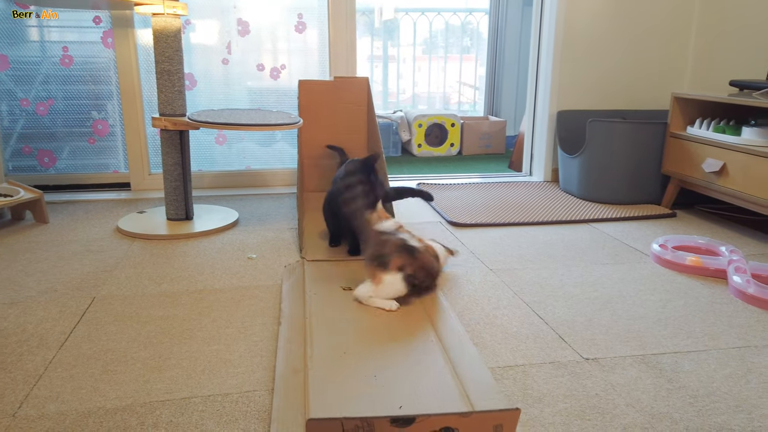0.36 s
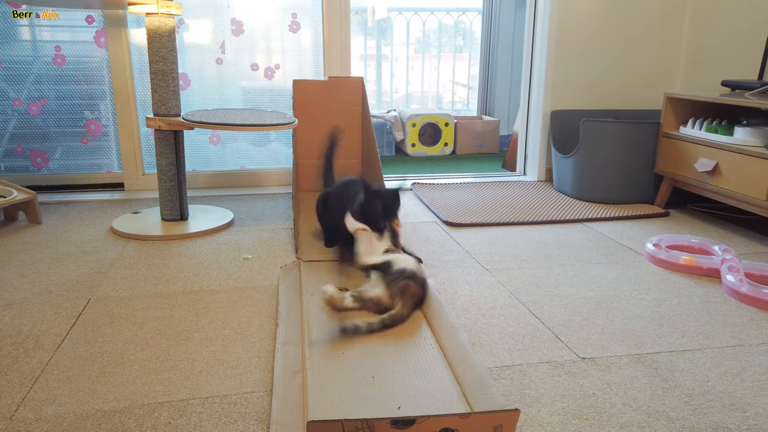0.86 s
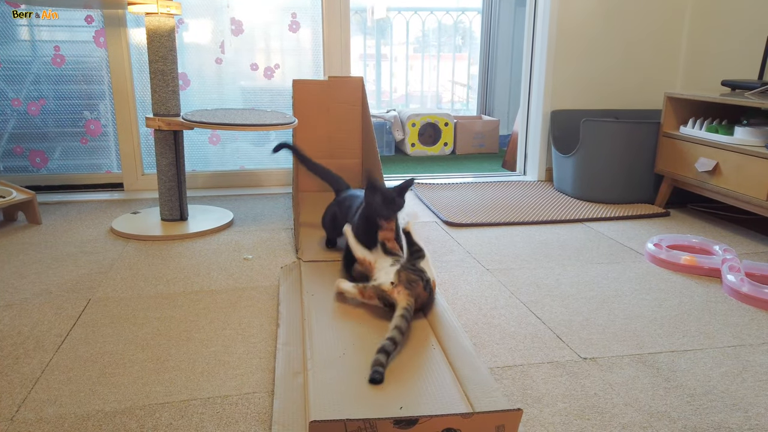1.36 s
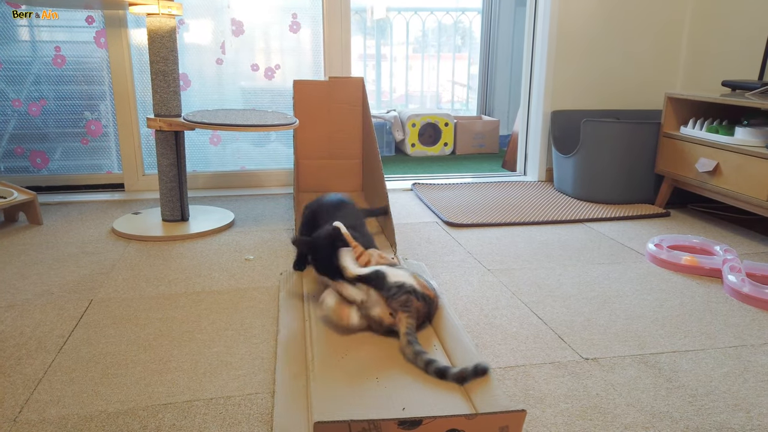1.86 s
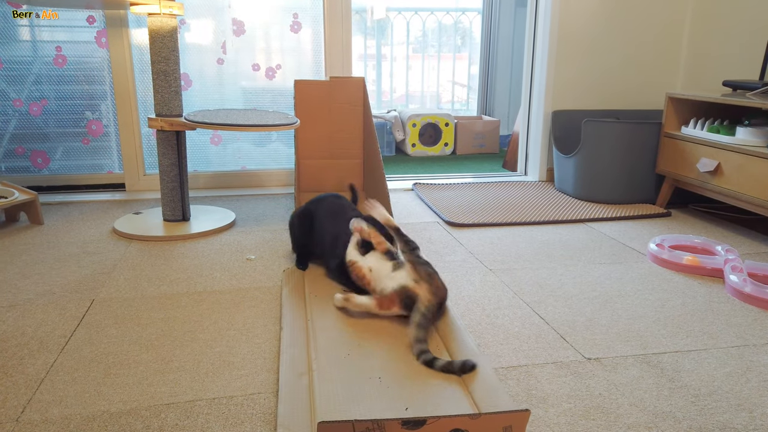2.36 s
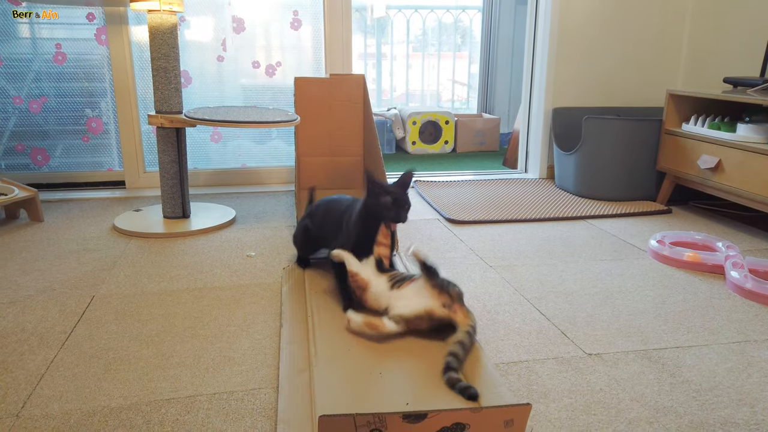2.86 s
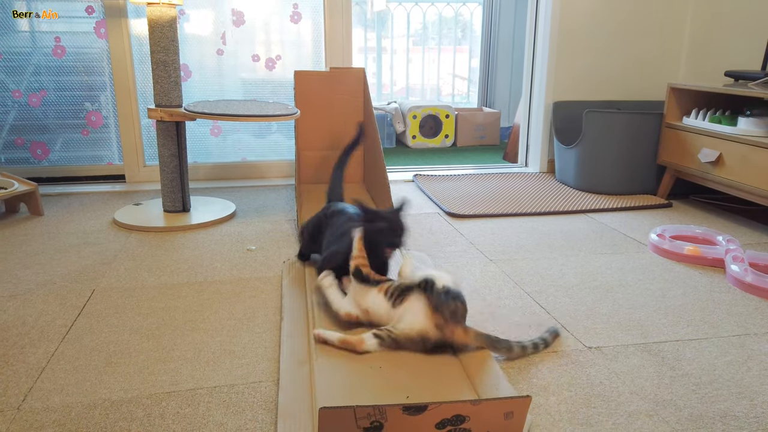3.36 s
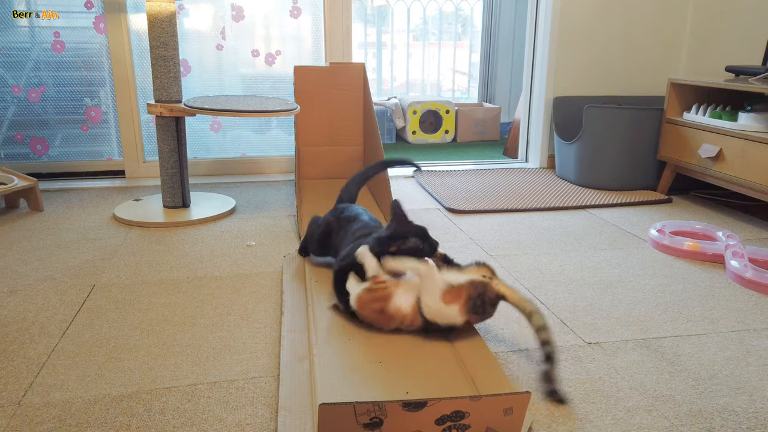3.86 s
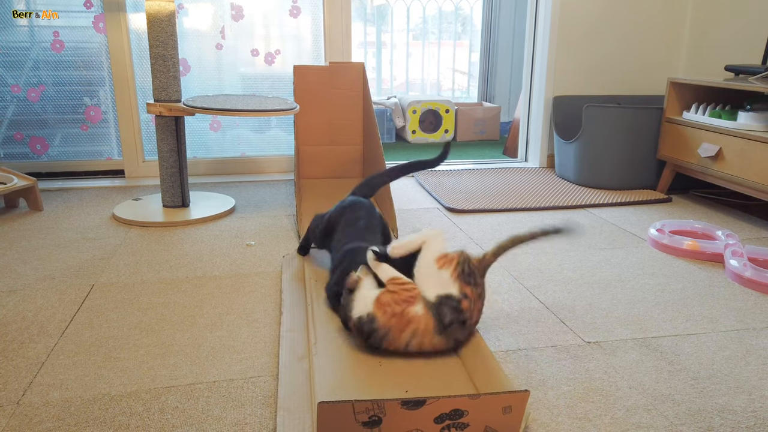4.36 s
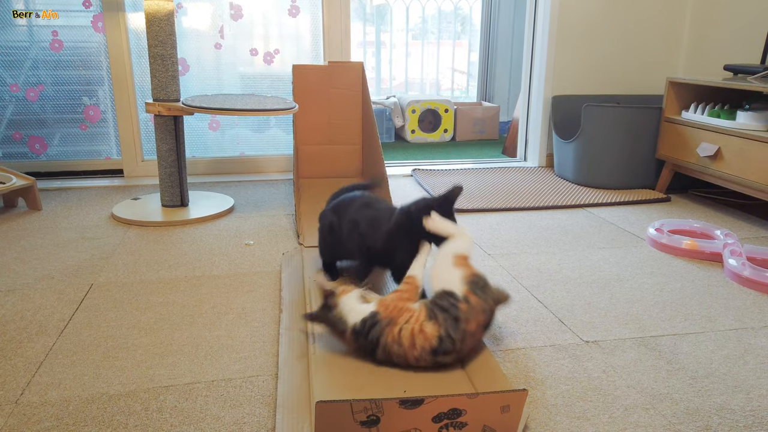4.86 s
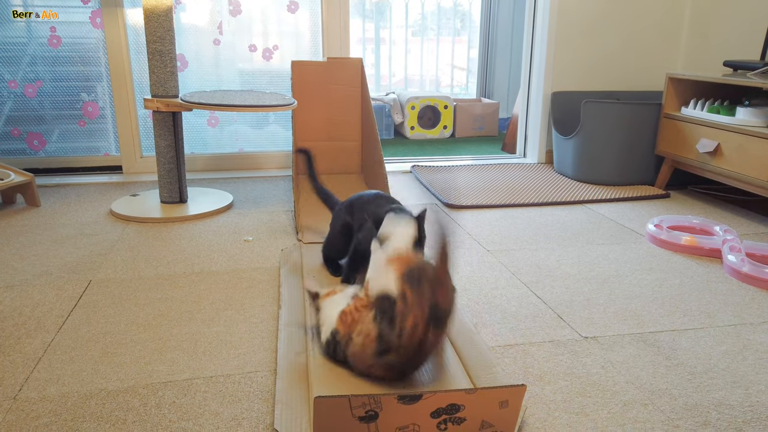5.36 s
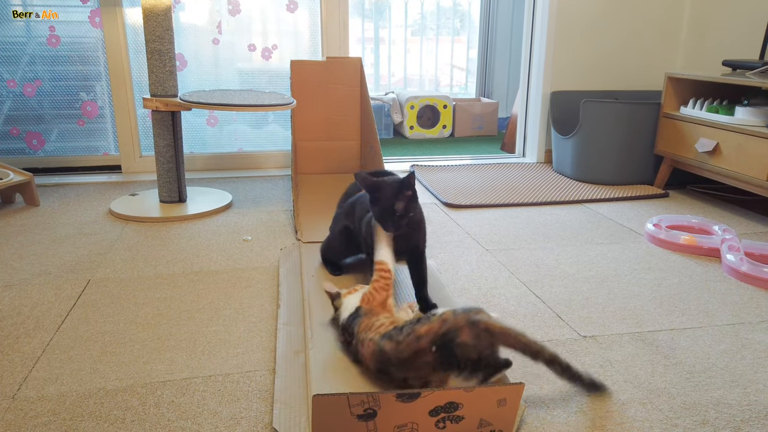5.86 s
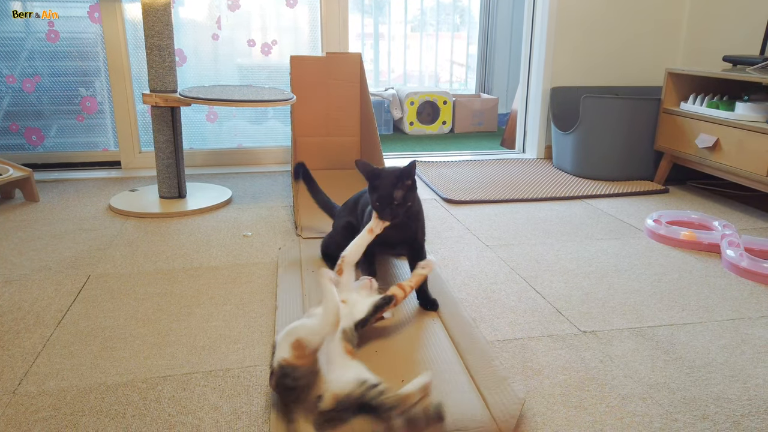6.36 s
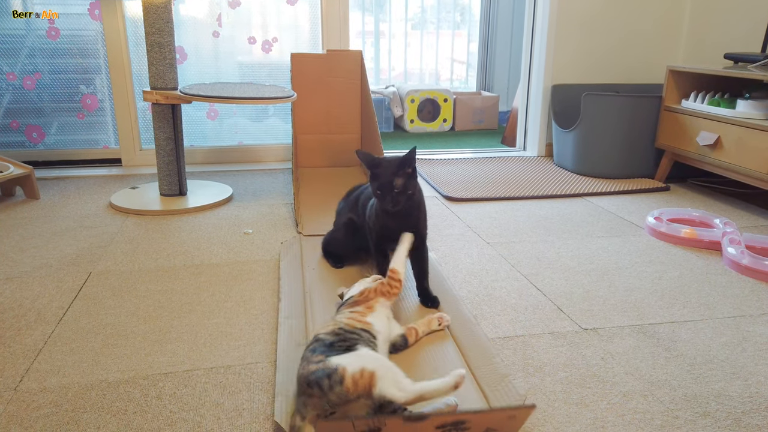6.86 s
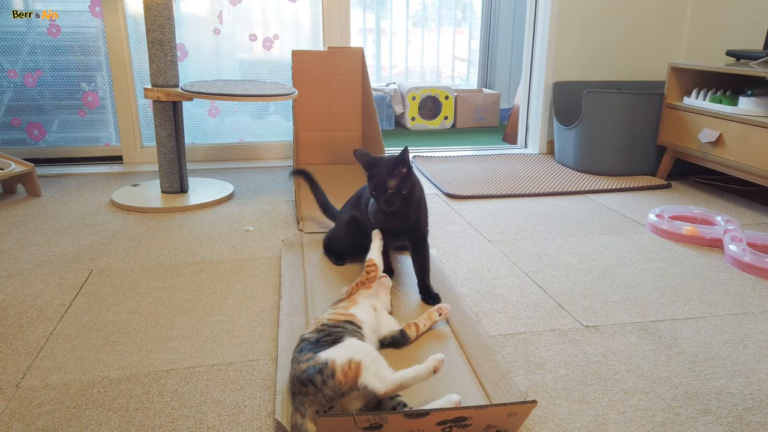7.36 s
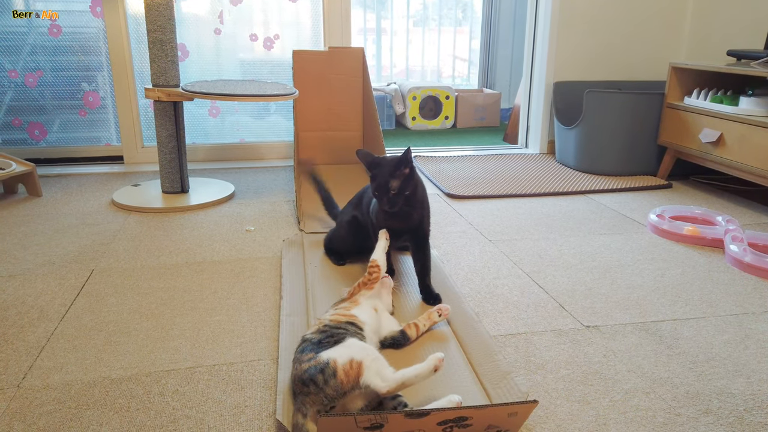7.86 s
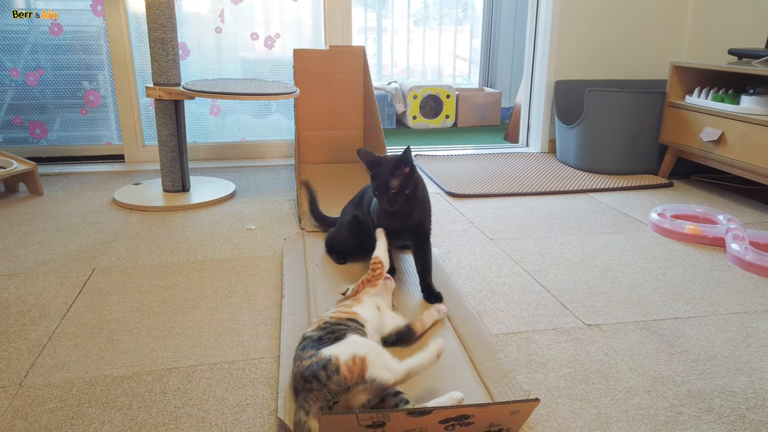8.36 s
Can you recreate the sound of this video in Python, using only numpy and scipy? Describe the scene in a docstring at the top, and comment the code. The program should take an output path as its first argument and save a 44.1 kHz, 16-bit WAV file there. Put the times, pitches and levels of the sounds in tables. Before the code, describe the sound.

Two cats tussle on flattened cardboard in a small soft room. The first two seconds are busiest: padded thumps, a strong burst of fur and claw rasp, then a sharp dry knock and a patter of lighter taps. Later come quieter slides and scuffs, a cluster of ticks, and one heavy hollow bang on the box. Then near silence with a dull bump. Close stereo microphones on the floor, low hum beneath.

```python
"""In a small, soft room two cats wrestle on a flattened cardboard box, a few steps from a camera on the floor.
Fur slides over the board and claws rasp: shaped stereo noise that follows each stroke over a faint steady floor.
Paws and bodies thump it, and one kick knocks the upright flap: filtered pushes, box modes and a room tail.
Brief claw scuffs, a dull floor bump, a low sway and narrow rustles are heard between.
Under it the room hums low: wavering narrow lines and quiet air."""
import sys
import numpy as np
from scipy import signal
from scipy.fft import rfft, irfft
from scipy.io import wavfile
from scipy.ndimage import uniform_filter1d, map_coordinates

SR = 44100
rng = np.random.default_rng(int(sys.argv[2]) if len(sys.argv) > 2 else 0)


def wrap_up_sound(samples):
    """Save the sound to the file named by the first command line argument, as 16-bit audio."""
    columns = np.atleast_2d(samples).T
    # keep every value between -1 and 1, then stretch to whole-number steps
    tamed = np.clip(columns, -1, 1)
    steps = np.round(tamed * 32767).astype(np.int16)
    wavfile.write(sys.argv[1], SR, steps)


def nominal_scale(level):
    """Amplitude ratio for a level in decibels (scalar or array-like)."""
    x = np.asarray(level, float) / 20
    return 10 ** x


N = 384492

# a body or paw slides over the board; levels before the room's lingering:
# (full speed from [s], held [s], fur hiss [dB], rasp [dB], rasp centre [Hz])
SLIDE_STROKES = [(0.0, 0.11, -62, -57, 1173), (0.258, 0.12, -55.5, -58.5, 1900),
                 (.56, 0.033, -63, -53.5, 1184), (.66, 0.027, -59, -52, 1100),
                 (.83, 0.044, -37.5, -39.5, 1935), (.92, 0.03, -39, -34.5, 1270),
                 (1.029, 0.088, -54.5, -45, 1113), (1.18, 0.073, -54, -53, 1110),
                 (1.3, 0.036, -57.5, -50.5, 1120), (1.4, 0.036, -64, -60, 1130),
                 (1.571, 0.016, -49, -47.5, 1187), (1.682, 0.37, -54, -54.5, 1402),
                 (2.171, 0.23, -70, -67, 1300), (2.399, 0.057, -61, -66.5, 1500),
                 (2.6, 0.14, -61.5, -66.5, 1300), (2.75, 0.049, -55.5, -54.5, 1250),
                 (2.83, 0.056, -59.5, -58.5, 1230), (3.01, 0.013, -49.5, -46, 1830),
                 (3.07, 0.063, -54.5, -51.5, 1522), (3.19, 0.017, -52.5, -54, 1300),
                 (3.27, 0.18, -56.5, -54, 1300), (3.5, 0.073, -51.5, -55, 1658),
                 (3.62, 0.072, -57, -58.5, 1650), (3.77, 0.19, -67.5, -62.5, 1500),
                 (3.969, 0.057, -57, -60, 1573), (4.05, 0.094, -55, -56, 1870),
                 (4.2, 0.066, -63.5, -63, 1697), (4.31, 0.31, -55.5, -55.5, 1935),
                 (4.64, 0.063, -52.5, -54.5, 1500), (4.76, 0.11, -60.5, -56, 1300),
                 (4.866, .14, -53.5, -51.5, 1480), (5.15, 0.094, -68, -64.5, 1380),
                 (5.4, 0.024, -55.5, -53.5, 1840), (5.62, .02, -46.5, -45.5, 1700),
                 (5.68, 0.012, -57, -46.5, 1658), (5.88, 0.047, -70, -63.5, 1240),
                 (6.0, 0.17, -78, -75, 1300), (6.23, 0.051, -58.5, -57.5, 1755),
                 (6.48, 0.012, -62, -51.5, 1185), (6.55, 0.0062, -56, -52, 1008),
                 (7.68, 0.026, -76, -77.5, 1300), (8.618, 0.034, -60.5, -64, 1914)]
# fur on board, relative spectrum: (frequency [Hz], density [dB per Hz])
FUR_SPECTRUM = [(1530, -30), (2600, -42.5), (2700, -10), (3310, -12.5), (3900, -13), (4230, -14),
                (5500, -10), (6160, -13), (9440, -14), (11100, -9), (14600, -20.5), (15600, -24.5)]
# resonances of the rubbed board: (centre [Hz], width [Hz], relative level [dB])
FLUTE_RESONANCES = [(560, 200, -8), (1080, 200, 1.5), (1450, 250, -5), (1950, 300, 0), (2600, 450, -2)]
# blows on the board; levels before the direct gain, band edges are fractions of the knock scale:
# (time [s], knock [dB], thud [dB], snap [dB], knock scale [Hz])
BLOW_EVENTS = [(.225, -54, -47.5, -46, 1040), (.468, -21, -26.5, -24, 1510),
               (.627, -28.5, -31, -33.5, 1630), (0.656, -29.5, -37, -38, 1300),
               (1.014, -31.5, -34.5, -58, 1260), (1.063, -12.5, -25, -28, 1680),
               (1.29, -35.5, -45.5, -42, 1320), (1.835, -67, -50, -65, 920),
               (1.922, -36.5, -54.5, -47, 1780), (1.993, -36, -38, -35, 1420),
               (2.02, -30.5, -46.5, -44.5, 1251), (2.028, -39, -30, -56, 860), (2.048, -35, -42, -57, 890),
               (2.737, -36, -47, -45, 1230), (3.372, -33.5, -65, -42.5, 2130),
               (4.603, -49, -38.5, -54, 1190), (5.537, -52, -67, -45.5, 2120), (5.61, -38, -47, -26, 1520),
               (5.62, -36, -52, -35, 1700), (5.684, -37.5, -33, -42, 840), (5.762, -36.5, -44.5, -50, 1760),
               (6.221, -60, -72, -54, 2100), (6.522, -10.5, -13.5, -36, 1170)]
# box and air ring together, decay when unpressed: (mode [Hz], relative level [dB], t60 [s])
BOX_MODES = [(183, -3, 0.45), (350, 0, 0.37), (415, -5, 0.24), (479, -11, 0.48), (576, -6, 0.29),
             (646, -2, 0.21), (743, -10, 0.3), (861, -13, 0.38), (910, -12, 0.37), (991, -9, 0.28)]
# band of the snap: (low edge [Hz], high edge [Hz])
SNAP_BAND = (1300, 2560)
# decay of the room: (frequency [Hz], t60 [s])
ROOM_DECAY = [(150, 0.4), (600, 0.42), (2000, 0.49), (8000, 0.091)]
# short claw scuffs: (time [s], skid [dB], centre [Hz], length [s], treble swish [dB])
CLAW_SCUFFS = [(0.463, -57, 2160, 0.03, -44), (2.73, -48.5, 1450, 0.029, -52.5),
               (2.974, -43.5, 1600, 0.05, -61), (4.83, -47.5, 1690, 0.032, -59.5),
               (5.541, -52.5, 2120, 0.028, -51), (5.597, -39.5, 1950, 0.015, -41),
               (4.949, -55.5, 1300, 0.12, -91.5), (5.777, -50.5, 1470, 0.0086, -72),
               (6.227, -53, 1730, 0.068, -113.5), (6.429, -48.5, 1430, 0.14, -63)]
# dull bump through the floor: (peak [dB], start [Hz], end [Hz])
BUMP = (-27, 90, 72)
# the floor sways under a rolling body: (time [s], level [dB], half length [s])
FLOOR_SWAYS = [(.45, -48, 0.25), (5.65, -42.5, 0.12)]
# narrow rustles that swell and fade: (time [s], level [dB], centre [Hz], width [Hz], half length [s])
RUSTLES = [(1.572, -54, 630, 300, 0.06), (1.575, -44, 2490, 720, 0.044), (1.585, -45.5, 13100, 3470, 0.042),
           (7.4, -72.5, 7840, 1300, 0.048), (8.45, -56.5, 189.4, 60, 0.064)]
# low lines of the room: (centre [Hz], width [Hz], level [dB])
HUM_LINES = [(26.85, 7, -54.5), (57.5, 7.2, -56.5), (125.9, 10, -66.5), (160, 12, -68), (183.4, 8.6, -64.5)]
# still air, relative spectrum: (frequency [Hz], density [dB per Hz])
AIR_SPECTRUM = [(47, -42), (80, -2), (185, -3), (241, -13.5), (328, -6.5), (447, -31), (623, -19),
                (1260, -23.5), (1380, -28.5), (1640, -24.5), (2560, -27.5), (3410, -40), (15600, -46.5)]
# correlation between the two microphones: (frequency [Hz], left-right likeness [0 to 1])
MICROPHONE_LIKENESS = [(60, 0.92), (180, 1), (550, 0.97), (1650, 0.79), (4970, 0.23), (15000, 0.068)]

RISE_DB_PER_S, FALL_DB_PER_S = 213.5, 166  # a slide speeds up and comes to rest
BASE_HISS_DB, BASE_RASP_DB = -83, -86  # steady faint hiss and rasp-coloured noise floor under the slides
# rumble at a mean rasp; dB per dB of rasp; the weight shifts slowly
RUMBLE_DB, RUMBLE_FOLLOWS, SETTLE_S = -64.5, 0.4, 0.13
DIRECT_DB = -3  # direct sound, before nearness and ticks add to it
HEAVY_DB, HEAVY_GAIN = -23, 0.48  # thuds above this land nearer, dB per dB
# knocks this far over their thud are dry claw ticks: direct sound gains dB per dB, up to a limit
TICK_DB, TICK_GAIN, TICK_MOST_DB = 8, 0.9, 6
BOUNCE_S, BOUNCE = .00235, .85  # the direct sound comes once more off the floor: delay, gain
CRACK_DB, CRACK_HZ = -13, (2600, 8000)  # a claw's dry edge: against the snap, band
BODY_DB, BODY_HZ, BODY_S = -11, 89.6, 0.0066  # floor push: against the thud, pitch, time constant
SAG_DB, SAG_HZ = -10.5, (110, 275)  # the loose board sags: against the thud capped at HEAVY_DB, band
RING_DB, RING_GAIN = -13, 0.24  # ring under light blows; more above HEAVY_DB, dB per dB
PRESSED = .3  # share of its ring time the board keeps under a cat; heavy blows shake it free
BUMP_S = 7.563
SWELL_DB, SWELLS_PER_S = 1.5, 1.964  # random swell of the lowest hum: spread, points a second
AIR_DB = -58


def sliding():
    """Fur hisses, paws rasp on the board's resonances, and the shifting weight makes it rumble."""
    motion = strokes()
    hiss_db, rasp_db, _ = curves(motion)

    def rasp_gain(hz, t):
        centre_hz = curves(motion, t)[2]
        flutes = sum(nominal_scale(db) * resonance(hz, c, w) for c, w, db in FLUTE_RESONANCES)
        return hump(hz, centre_hz, 0.99) * flutes

    fur = pair(N, lambda hz, t: nominal_scale(along(FUR_SPECTRUM, hz)), patchy_db=1.5)
    rasp = pair(N, rasp_gain, patchy_db=1.2, rough_db=2.5)
    rumble = pair(N, lambda hz, t: hump(hz, 300, .7), patchy_db=1.5, rough_db=1)
    pressure_db = uniform_filter1d(rasp_db - rasp_db.mean(), round(SETTLE_S * SR) + 1)
    weight_db = RUMBLE_DB + RUMBLE_FOLLOWS * pressure_db
    hiss = lingering(hiss_db, t60=0.033) * unit(fur)
    rasp = lingering(rasp_db, t60=0.1002) * unit(rasp)
    return hiss + rasp + nominal_scale(weight_db) * unit(rumble)


def strokes():
    """Time, hiss dB, rasp dB and rasp centre Hz of all slides over the steady noise floor."""
    t = np.arange(0, N / SR + .004, .002)
    s, held, hiss_db, rasp_db, centre_hz = np.transpose(SLIDE_STROKES)[:, :, None]
    rising_db = RISE_DB_PER_S * np.clip(s - t, 0, None)
    falling_db = FALL_DB_PER_S * np.clip(t - s - held, 0, None)
    slower_db = rising_db + falling_db
    hiss, rasp = nominal_scale(2 * (hiss_db - slower_db)), nominal_scale(2 * (rasp_db - slower_db))  # powers
    weight = rasp + 1e-12
    centre = np.sum(weight * centre_hz, axis=0) / np.sum(weight, axis=0)  # the loudest slide leads
    hiss_sum_db = 10 * np.log10(hiss.sum(axis=0) + nominal_scale(2 * BASE_HISS_DB))
    rasp_sum_db = 10 * np.log10(rasp.sum(axis=0) + nominal_scale(2 * BASE_RASP_DB))
    return np.transpose([t, hiss_sum_db, rasp_sum_db, centre])


def lingering(db, t60):
    """Gain of a level curve part of whose energy hangs in the room after each swell."""
    keep = nominal_scale(-120 / (t60 * SR))
    power = nominal_scale(2 * db)
    hanging = signal.lfilter([1 - keep], [1, -keep], power)
    return np.sqrt(.6 * power + .4 * hanging)


def blows():
    """Each blow is one push heard direct and off the floor; box ring and room tail answer it."""
    out, t = np.zeros((2, N + SR)), np.arange(SR // 2) / SR
    push = 1. * (t == 0)
    for s, knock_db, thud_db, snap_db, top_hz in BLOW_EVENTS:
        heavy_db = max(thud_db - HEAVY_DB, 0)
        tick_db = np.clip(TICK_GAIN * (knock_db - thud_db - TICK_DB), 0, TICK_MOST_DB)
        direct_db = DIRECT_DB + HEAVY_GAIN * heavy_db + tick_db
        hit = contact(push, knock_db, thud_db, snap_db, top_hz)
        near = hit + nominal_scale(snap_db + CRACK_DB) * band(push, CRACK_HZ)
        near = near + BOUNCE * np.interp(t - BOUNCE_S, t, near, left=0)
        body = nominal_scale(thud_db + BODY_DB) * np.sin(2 * np.pi * BODY_HZ * t) * np.exp(-t / BODY_S)
        ring_db = RING_DB + RING_GAIN * heavy_db
        answer = nominal_scale(1.5) * room_tail(t) + nominal_scale(ring_db) * box_ring(t, thud_db)
        answered = signal.fftconvolve(hit[None], answer, axes=1)[:, :len(t)]
        out[:, round(s * SR):][:, :len(t)] += nominal_scale(direct_db) * (near + body) + answered
    return out[:, :N]


def contact(push, knock_db, thud_db, snap_db, top_hz):
    """A push in the knock, thud and snap bands, with the sag of the loose board."""
    knock = band(push, (0.41 * top_hz, top_hz))
    knock = band(knock, (0.35 * top_hz, 0.89 * top_hz))  # a padded paw: little above the knock
    thud_hz = (np.interp(thud_db, [-22, -16], [280, 165]), 470)  # heavy blows reach deeper
    hit = nominal_scale(knock_db) * knock + nominal_scale(thud_db) * band(push, thud_hz)
    hit = hit + nominal_scale(snap_db) * band(push, SNAP_BAND)
    return hit + nominal_scale(min(thud_db, HEAVY_DB) + SAG_DB) * band(push, SAG_HZ)


def box_ring(t, thud_db):
    """Decaying box modes, damped by a cat's weight unless the blow is heavy; energy 1."""
    free = np.interp(thud_db, [-22, -16], [PRESSED, 1])
    ring = np.zeros(len(t))
    for hz, db, t60 in BOX_MODES:
        level_db = db + rng.normal(0, 2)  # no two blows excite the modes alike
        ring += nominal_scale(level_db - 60 * t / (free * t60)) * np.sin(2 * np.pi * hz * t)
    return ring / np.linalg.norm(ring)


def room_tail(t):
    """Fresh patchy noise decaying as the room does; left energy 1."""
    def decay(hz, age):
        return nominal_scale(-60 * age / along(ROOM_DECAY, hz)) * (1 + 1.1 * np.exp(-age / 0.035))

    tail = pair(len(t), decay, patchy_db=1.5, rough_db=2.5)
    tail = tail * np.clip((t - .003) / 0.002, 0, 1)  # the nearest walls answer after a few ms
    return tail / np.linalg.norm(tail[0])


def scuffs():
    """Claws skid: gritty noise round one pitch with a bright swish, quick start, then a decay."""
    out, t = np.zeros((2, N + SR)), np.arange(SR // 2) / SR

    def swish_gain(hz, age):
        return nominal_scale(along(FUR_SPECTRUM, hz)) * (hz / 8000) ** 0.15

    for s, skid_db, centre_hz, length, swish_db in CLAW_SCUFFS:
        skid = pair(len(t), lambda hz, age: hump(hz, centre_hz, .4), patchy_db=3, rough_db=4.5)
        swish = pair(len(t), swish_gain, patchy_db=3.5, rough_db=2.5)
        start = np.clip(t / (0.28 * length), 0, 1)
        release = nominal_scale(-60 * np.clip(t - length, 0, None) / 0.24)
        claws = nominal_scale(skid_db) * unit(skid) + nominal_scale(swish_db) * unit(swish)
        out[:, round(s * SR):][:, :len(t)] += start * release * claws
    return out[:, :N]


def floor_bump():
    """A dull bump through the floor: a short sine sinking in pitch."""
    peak_db, start_hz, end_hz = BUMP
    t = np.clip(np.arange(N) / SR - BUMP_S, 0, None)
    turns = end_hz * t + (start_hz - end_hz) * .03 * (1 - np.exp(-t / .03))
    shape = t ** 2 * np.exp(-t / .014)
    return nominal_scale(peak_db) * shape / shape.max() * np.sin(2 * np.pi * turns)


def floor_sway():
    """The floor sways under a rolling body: a low wavering line that swells and fades."""
    return narrow(38.4, 38) * sum(nominal_scale(db) * swelling(s, half) for s, db, half in FLOOR_SWAYS)


def rustles():
    """Short narrow rustles: noise in one resonance that swells and fades."""
    out = np.zeros((2, N))
    for s, db, centre_hz, width_hz, half in RUSTLES:
        noise = pair(N, lambda hz, t: resonance(hz, centre_hz, width_hz))
        out += nominal_scale(db) * unit(noise) * swelling(s, half)
    return out


def room_tone():
    """Quiet air and a few wavering low lines; the lowest swells slowly."""
    lines = [nominal_scale(db) * narrow(hz, width_hz) for hz, width_hz, db in HUM_LINES]
    swell = map_coordinates(rng.standard_normal(100), [np.arange(N) / SR * SWELLS_PER_S])
    lines[0] = lines[0] * nominal_scale(SWELL_DB * swell)
    air = pair(N, lambda hz, t: nominal_scale(along(AIR_SPECTRUM, hz)))
    return sum(lines) + nominal_scale(AIR_DB) * unit(air)


def unit(x):
    """Scaled to rms 1."""
    return x / np.sqrt(np.mean(x ** 2) + 1e-20)


def along(points, hz):
    """Reads (Hz, value) points on a log frequency axis."""
    f, v = np.transpose(points)
    return np.interp(np.log(hz + 1), np.log(f + 1), v)


def curves(rows, t=None):
    """One value per time for each column after the first."""
    s, *cols = np.transpose(rows)
    t = np.arange(N) / SR if t is None else t
    return [np.interp(t, s, c) for c in cols]


def resonance(hz, centre_hz, width_hz):
    """Gain of one resonance, halved at the edges of its width."""
    return 1 / (1 + ((hz - centre_hz) / width_hz * 2) ** 2)


def hump(hz, centre_hz, width):
    """Bell-shaped gain on a log frequency axis; width in natural-log units."""
    return np.exp(-(np.log((hz + 1) / centre_hz) / width) ** 2)


def swelling(s, half):
    """Bell-shaped swell in time round s seconds."""
    return np.exp(-((np.arange(N) / SR - s) / half) ** 2)


def pair(length, gain, patchy_db=0, rough_db=0):
    """Stereo noise as two close microphones hear it, times gain(Hz, s), with patches and grit."""
    grit = nominal_scale(rough_db * unit(uniform_filter1d(rng.standard_normal(length), size=40)))
    hz, t, z = signal.stft(grit * rng.standard_normal((2, length)), SR, nperseg=512)
    field = uniform_filter1d(rng.standard_normal(z.shape[1:]), size=6, axis=0)
    field = uniform_filter1d(field, size=8, axis=1)
    # the angle splits the noise into mid and side to give the wanted correlation
    turn = np.arccos(np.clip(along(MICROPHONE_LIKENESS, hz), 0, 1))[:, None] / 2
    z = z * [np.cos(turn), np.sin(turn)] * gain(hz[:, None], t) * nominal_scale(patchy_db * unit(field))
    mid, side = signal.istft(z, SR, nperseg=512)[1][:, :length]
    return np.array([mid + side, mid - side])


def band(x, edges_hz):
    """Steep causal band-pass, scaled to peak 1."""
    y = signal.sosfilt(signal.butter(4, edges_hz, "bandpass", fs=SR, output="sos"), x)
    return y / np.abs(y).max()


def narrow(hz, width_hz):
    """A wavering line: noise in one narrow resonance, rms 1."""
    f = np.fft.rfftfreq(N, 1 / SR)
    return unit(irfft(rfft(rng.standard_normal(N)) * resonance(f, hz, width_hz), N))


def scene():
    """The cats on the box, the floor under them and the room, summed with no panning."""
    cats = sliding() + blows() + scuffs()
    return cats + floor_bump() + floor_sway() + rustles() + room_tone()


def low_pass(x):
    """Removes everything above the highest recorded frequency."""
    return signal.sosfilt(signal.butter(12, 15760, fs=SR, output="sos"), x)


def record(dry):
    """The camera on the floor takes the finished mix at its own level."""
    return low_pass(dry)


dry = scene()
out = record(dry)
wrap_up_sound(out)
```